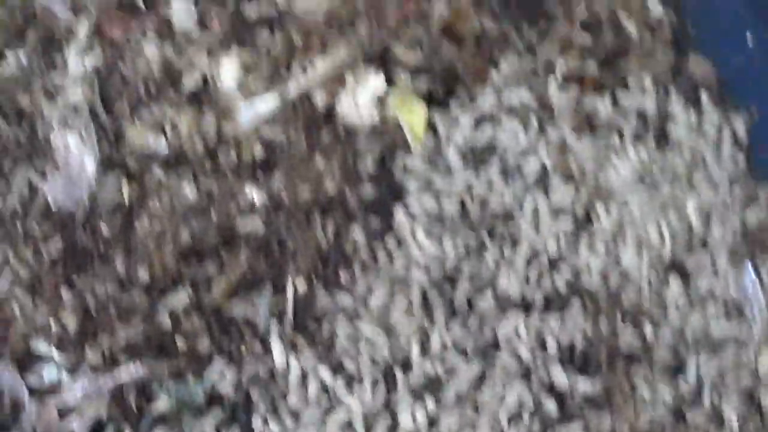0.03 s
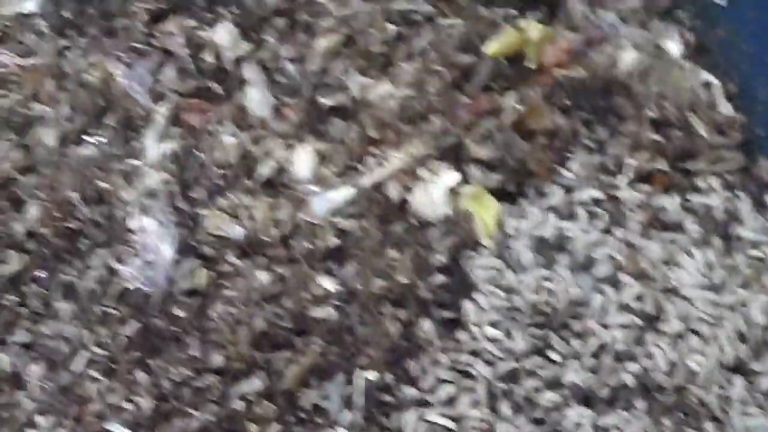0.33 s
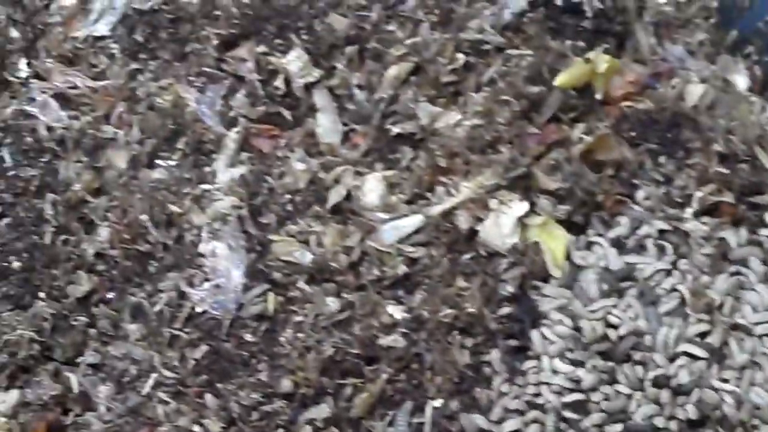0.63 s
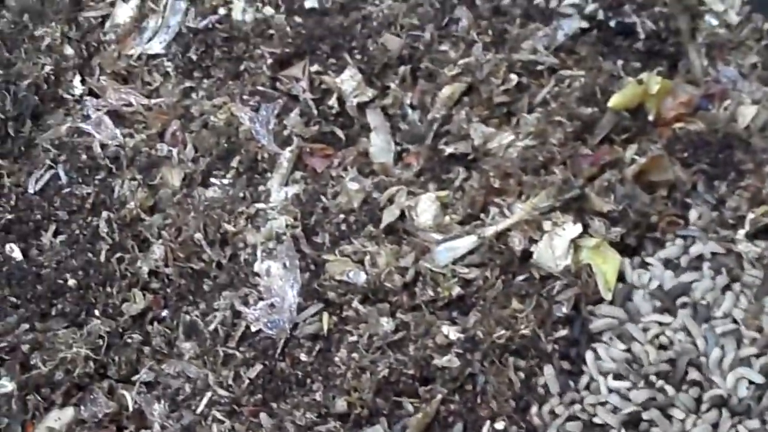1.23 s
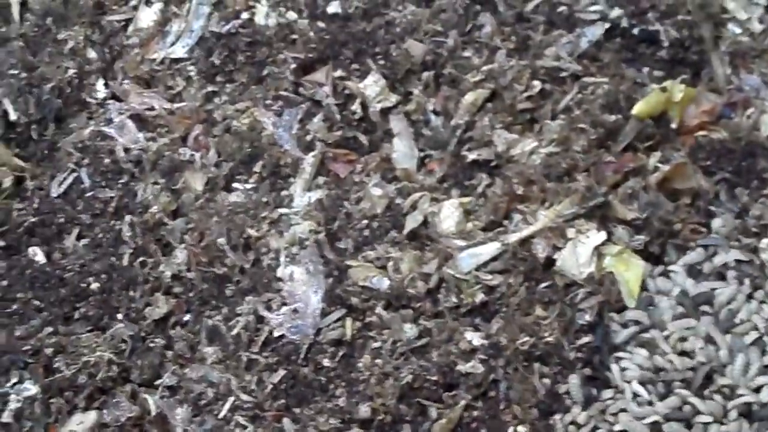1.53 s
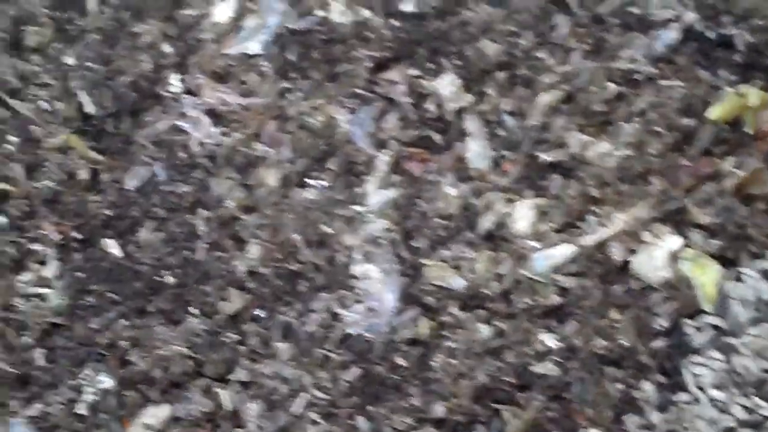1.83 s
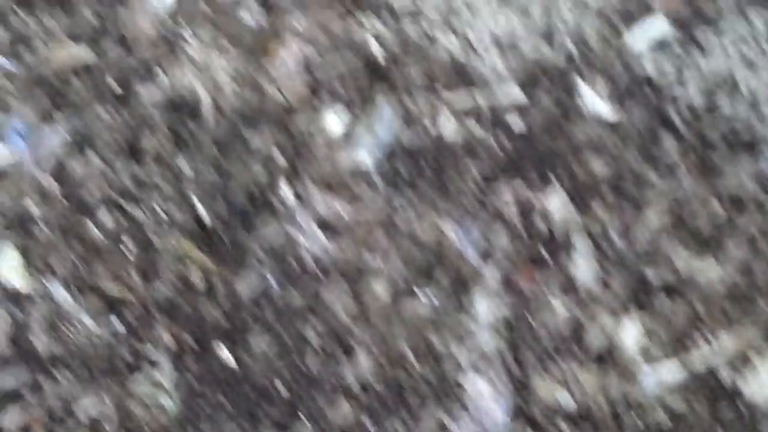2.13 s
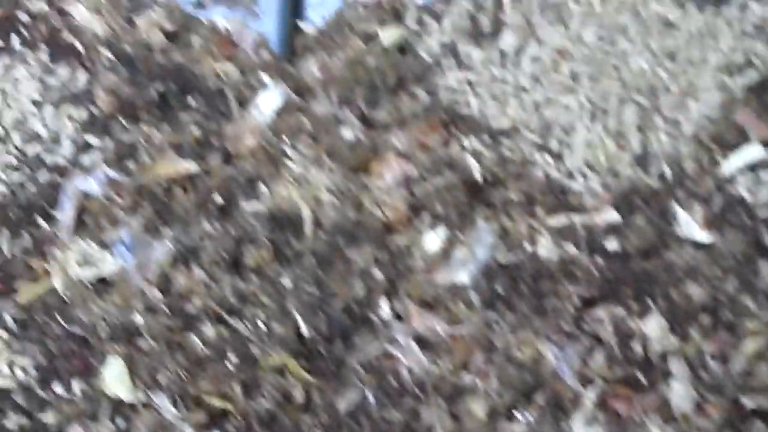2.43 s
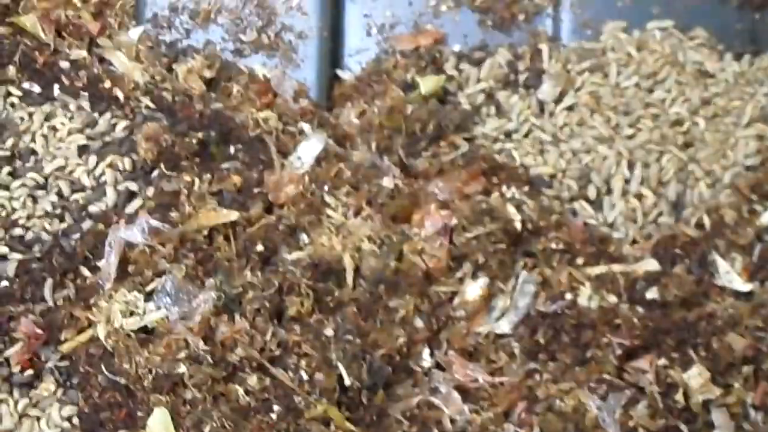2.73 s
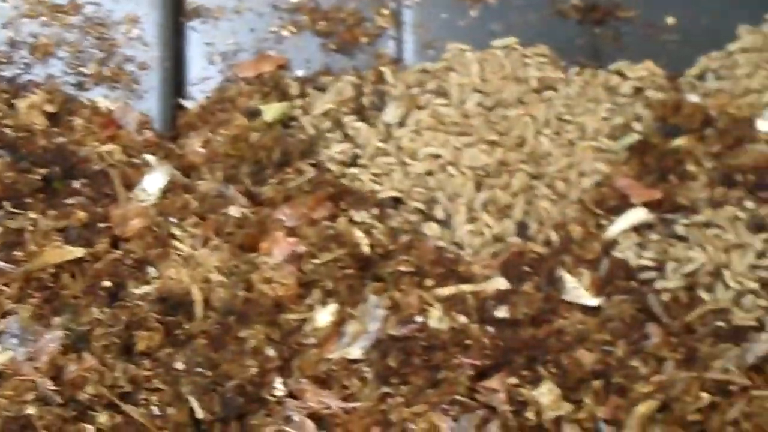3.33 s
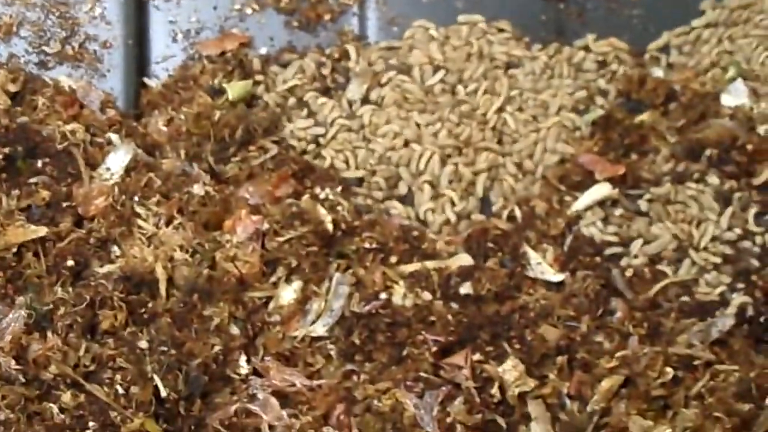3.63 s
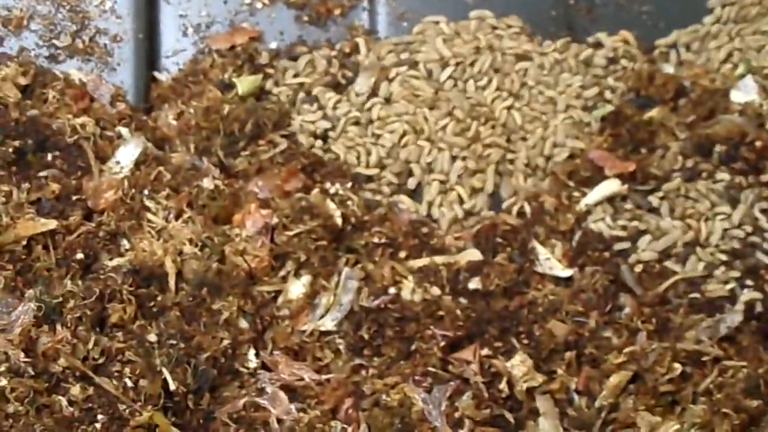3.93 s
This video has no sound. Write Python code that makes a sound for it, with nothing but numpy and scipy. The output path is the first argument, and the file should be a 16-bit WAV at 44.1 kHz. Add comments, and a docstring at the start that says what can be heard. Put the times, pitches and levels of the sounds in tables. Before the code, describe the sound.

Larvae churn through damp food waste, their tiny clicks merging into a soft, steady hiss over an outdoor rumble and a distant motor hum. Near the end, puffs of air hit the hand-held microphone with dull thumps.

```python
"""Larvae in a bin

A mass of larvae churns through damp food waste: countless tiny clicks merge into a steady hiss.
Behind it lie an outdoor rumble and the low hum of a distant motor. Near the end, puffs of air
buffet the moving hand-held microphone with dull thumps, and the waste gives two faint ticks."""
import sys
import numpy as np
from scipy import signal
from scipy.fft import rfft, irfft
from scipy.io import wavfile
from scipy.ndimage import uniform_filter1d

SR = 44100
rng = np.random.default_rng(int(sys.argv[2]) if len(sys.argv) > 2 else 0)


def bounce(signal):
    """Save signal as a 16-bit WAV file at the path given by the first command-line argument."""
    frames = np.transpose(np.atleast_2d(signal))
    limited = np.clip(frames, -1, 1)
    pcm = np.round(limited * 32767).astype(np.int16)
    wavfile.write(sys.argv[1], SR, pcm)


N = 176400


def undb(db):
    """Decibels to gain."""
    return 10 ** (np.asarray(db) / 20)


def unit(x):
    """Scale to rms 1."""
    return x / np.sqrt(np.mean(x ** 2))


def curve(rows, t):
    """Gain along rows of (s, dB)."""
    return undb(np.interp(t, *np.array(rows).T))


def shape(x, gain):
    """Filter by a gain that is a function of Hz."""
    hz = np.maximum(np.fft.rfftfreq(len(x), 1 / SR), 1)
    return irfft(rfft(x) * gain(hz), len(x))


def colour(x, points):
    """Filter by (Hz, dB) points, then scale to rms 1."""
    hz, db = np.array(points).T
    return unit(shape(x, lambda f: undb(np.interp(np.log(f), np.log(hz), db))))


def drift(rate_hz):
    """Smooth random drift, rms 1."""
    hold = int(SR / rate_hz)
    steps = np.repeat(rng.standard_normal(N // hold + 1), hold)
    return unit(uniform_filter1d(uniform_filter1d(steps, hold), hold)[:N])


def larvae(t):
    """Near larvae make dense wet clicks of uneven size; those deeper in the heap blur into a wash."""
    # Each row: frequency in Hz, relative spectral density in dB.
    hiss_spectrum = [(500, -10), (900, -8), (1270, -5.5), (1480, -0.1), (1680, -0.4), (1900, -3),
                     (2150, -1.6), (2500, -4.5), (3100, -5.5), (4000, -8.5), (5000, -12.5), (7300, -16.5),
                     (9700, -21), (12000, -27.5), (14000, -32)]
    # The microphone moves over the bin. Each row: time in seconds, relative level in dB.
    hiss_levels = [(0, -50.5), (.7, -49.5), (1.1, -50), (1.6, -50.3), (2.4, -50.5), (3.15, -51), (3.4, -52),
                   (4, -51)]
    clicks_per_s, spread_db, wash_db, gain_db = 12000, 2, 1, .5
    treble_hz, treble_db_per_s = 4000, -.4
    onsets = rng.random(N) < clicks_per_s / SR
    sizes = undb(spread_db * np.minimum(rng.exponential(size=N), 6))
    clicks = unit(onsets * sizes * rng.choice([-1, 1], N))
    wash = undb(wash_db) * rng.standard_normal(N)
    hiss = colour(clicks + wash, hiss_spectrum)
    # The treble flickers, and fades as the microphone draws back.
    treble = shape(hiss, lambda f: f ** 2 / (f ** 2 + treble_hz ** 2))
    treble_gain = undb(treble_db_per_s * (t - t.mean()) + .22 * drift(rate_hz=21))
    hiss = hiss - treble + treble * treble_gain
    return hiss * curve(hiss_levels, t) * undb(gain_db)


def outdoor_rumble():
    """Low, gently wavering noise."""
    # Each row: frequency in Hz, relative spectral density in dB.
    rumble_spectrum = [(10, 2.5), (35, 0), (55, 3), (72, 5.5), (97, -3), (115, -3.5), (145, -1), (190, -7),
                       (270, -6.5), (320, -15), (430, -15), (600, -18), (780, -19.5), (1100, -25.5),
                       (2000, -38.5), (6000, -55)]
    level_db, waver_db = -33.5, .5
    rumble = colour(rng.standard_normal(N), rumble_spectrum)
    return rumble * undb(level_db + waver_db * drift(rate_hz=5.88))


def motor(t):
    """A deep drone that swells and fades, with three unsteady tones above it."""
    # Each row: time in seconds, level in dB.
    drone_levels = [(0, -39), (.3, -35), (.47, -46), (.62, -34), (1.0, -34), (1.16, -48), (1.3, -33),
                    (1.62, -32), (1.8, -48), (2.1, -39), (2.38, -37), (2.55, -48), (2.8, -41)]
    # Each row: frequency in Hz, level in dB, pitch wander as a fraction.
    hum_tones = [(69, -44, .03), (143.2, -48.5, 0.0083), (403, -58, .008)]

    def tone(hz, wander):
        pitch_hz = hz * (1 + wander * drift(rate_hz=14))
        return np.sqrt(2) * np.sin(2 * np.pi * np.cumsum(pitch_hz) / SR)

    drone = tone(hz=46.36, wander=.0087) * curve(drone_levels, t)
    hum = sum(tone(hz, wander) * undb(db + 1.5 * drift(rate_hz=4.96)) for hz, db, wander in hum_tones)
    return drone + hum


def air_puffs(t):
    """Pressure builds, flips as each vortex passes the microphone port, and relaxes; eddies ride on it."""
    # Each row: centre in seconds, half length in seconds, relative level in dB, upper edge in Hz.
    puffs = [ (2.880, .012, -27, 110), (2.916, .015, -12.5, 240), (2.975, 0.0093, -20, 110),
             (3.014, 0.0078, -25.5, 230), (3.052, 0.018, -23.5, 109), (3.100, 0.021, -29, 150),
             (3.17, 0.0084, -4.5, 111), (3.194, 0.0094, -13, 520), (3.209, .004, -14.5, 700),
             (3.226, 0.0077, -12.5, 405), (3.254, 0.011, -15, 60), (3.281, 0.0069, -18, 300),
             (3.304, 0.0093, -8, 390), (3.313, .007, -16.5, 220), (3.328, .009, -12.5, 240),
             (3.353, 0.013, -15, 258), (3.400, 0.015, -17.5, 170), (3.425, 0.0068, -10, 417),
             (3.456, 0.013, -17, 130), (3.505, 0.013, -31, 130), (3.611, 0.017, -23, 103),
             (3.678, 0.011, -15.5, 80), (3.692, 0.013, -12.5, 141), (3.720, 0.016, -11.5, 171),
             (3.733, 0.01, -17.5, 650), (3.754, 0.0075, -7.5, 55), (3.768, 0.012, -12, 320),
             (3.795, .004, -23, 590), (3.808, 0.025, -16.5, 90), (3.847, .011, -14, 140),
             (3.872, 0.0089, -17.5, 280), (3.908, 0.014, -21, 220), (3.932, 0.017, -17, 68.6)]
    gain_db, eddy_db, eddy_hz = -2.5, -6, 130
    low_cut_hz, edge_order = 9.5, 3.16
    size = 2 ** 14
    local_s = (np.arange(size) - size // 2) / SR
    out = np.zeros(N)
    for centre_s, half_s, db, edge_hz in puffs:
        port = lambda f: f / np.hypot(f, low_cut_hz) / np.hypot(1, (f / edge_hz) ** edge_order)
        vortex = np.sign(local_s) * np.exp(-np.abs(local_s) / half_s)
        eddies = shape(rng.standard_normal(size), lambda f: 1 / np.hypot(1, f / eddy_hz))
        swell = np.exp(-.5 * (local_s / half_s) ** 2)
        puff = unit(shape(vortex, port)) + undb(eddy_db) * unit(shape(eddies * swell, port))
        puff = unit(puff) * np.sqrt(np.mean(swell ** 2)) * undb(db + gain_db)
        out += np.interp(t - centre_s, local_s, puff, left=0, right=0)
    return out


def waste_ticks(t):
    """Two faint, crisp snaps in the waste."""
    # Each row: start in seconds, level in dB.
    ticks = [(3.1645, -54), (3.4828, -57)]
    centre_hz, half_width_hz, decay_s = 10000, 3000, .0012
    band = lambda f: 1 / (1 + ((f - centre_hz) / half_width_hz) ** 2)
    noise = unit(shape(rng.standard_normal(N), band))
    envelope = sum(undb(db) * (t >= at_s) * np.exp(-np.abs(t - at_s) / decay_s) for at_s, db in ticks)
    return noise * envelope


def scene():
    """All sources at one microphone."""
    t = np.arange(N) / SR
    return (larvae(t) + outdoor_rumble() + motor(t) + air_puffs(t) + waste_ticks(t))[None]


def record(dry):
    """The recorder cuts the top steeply."""
    cutoff_hz = 14230
    return signal.sosfilt(signal.ellip(12, .1, 80, cutoff_hz, fs=SR, output="sos"), dry)


dry = scene()
out = record(dry)
bounce(out)
```